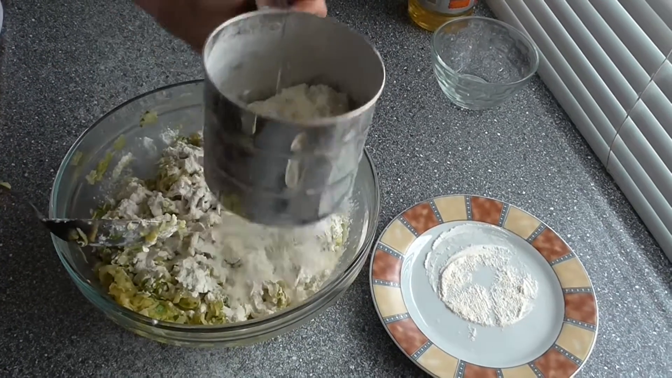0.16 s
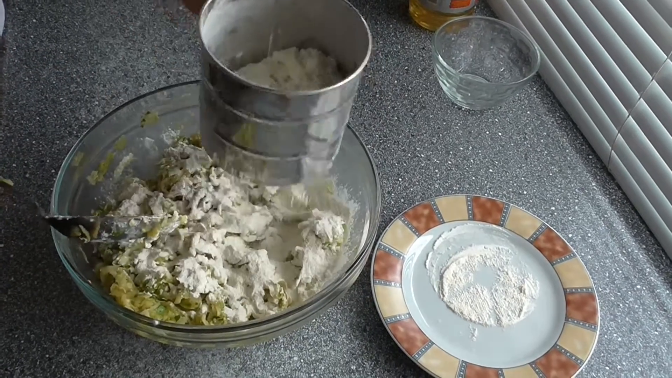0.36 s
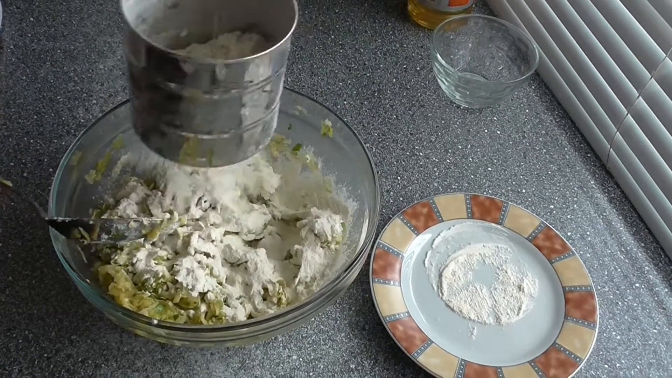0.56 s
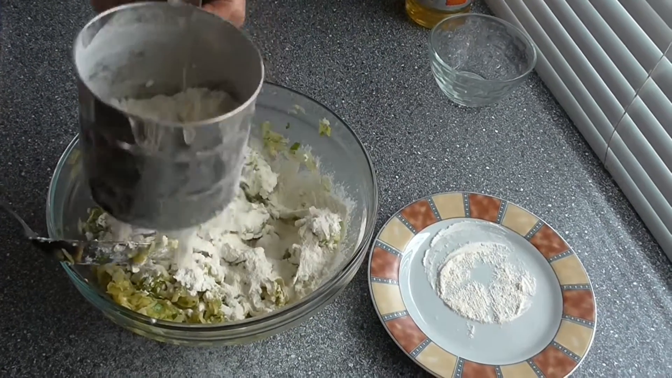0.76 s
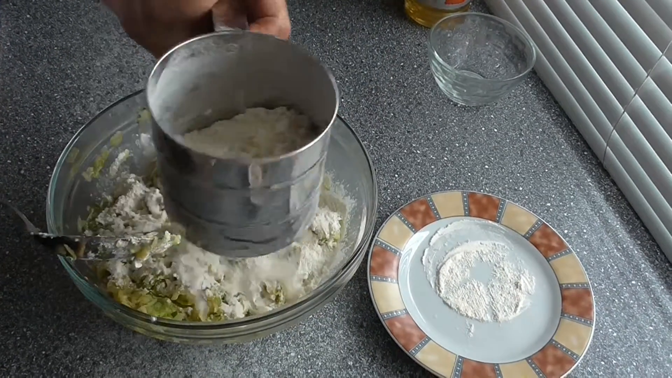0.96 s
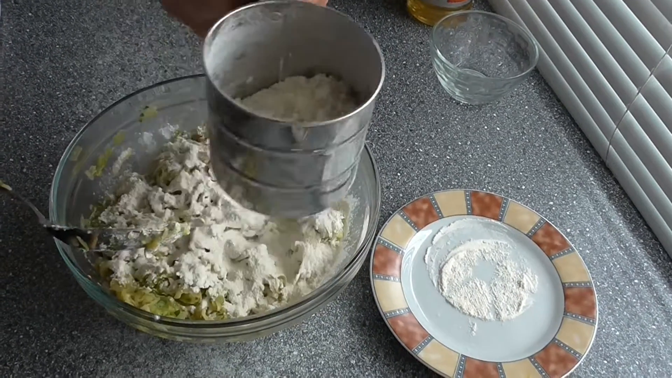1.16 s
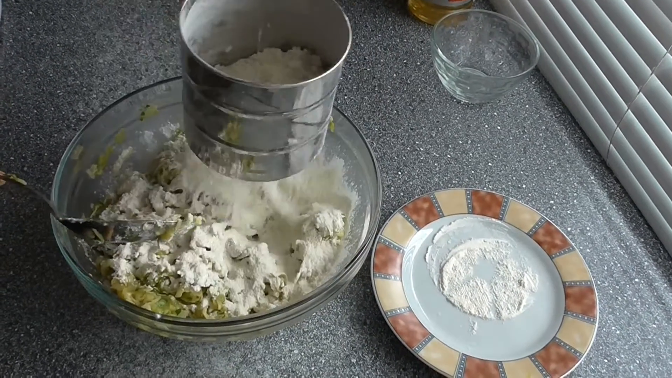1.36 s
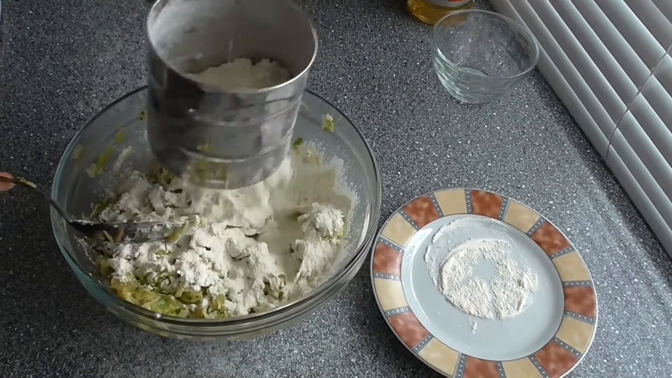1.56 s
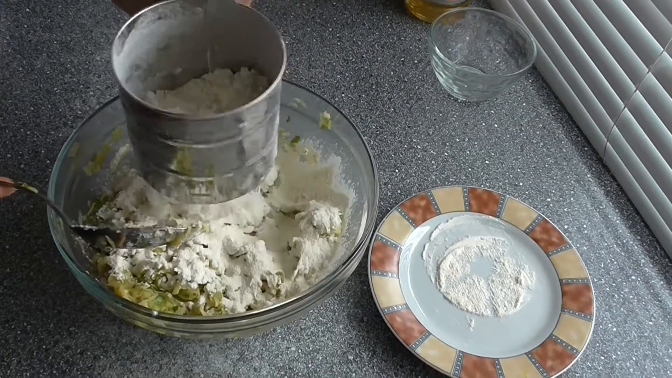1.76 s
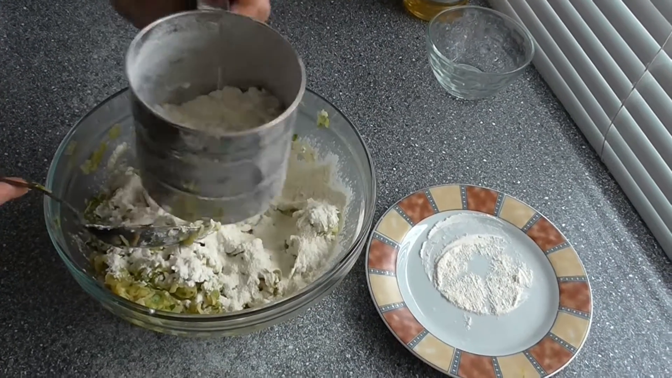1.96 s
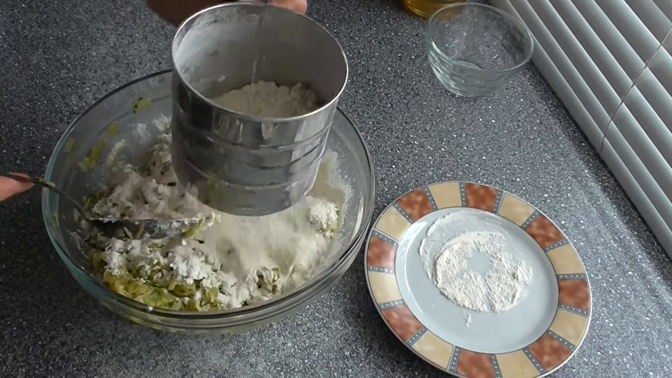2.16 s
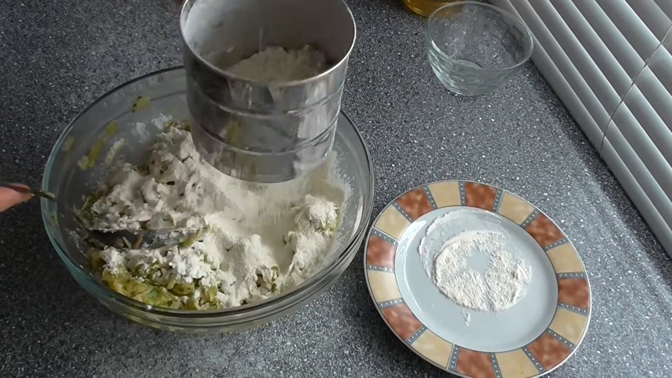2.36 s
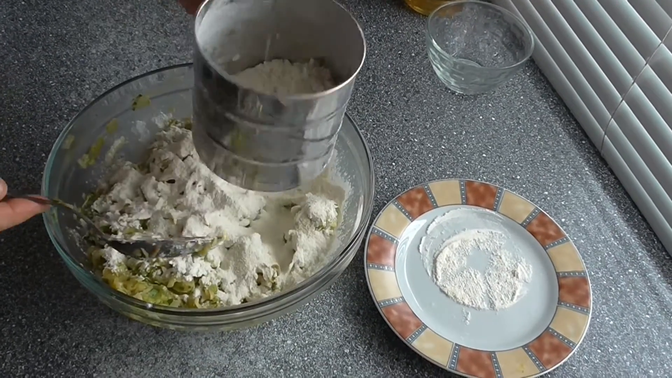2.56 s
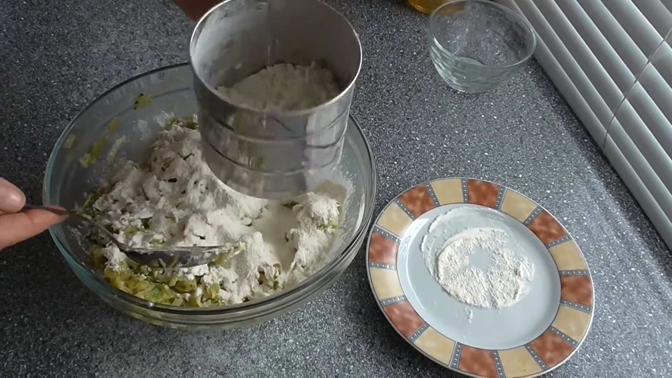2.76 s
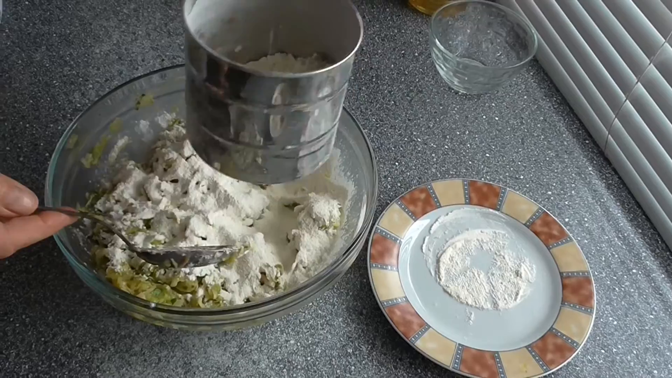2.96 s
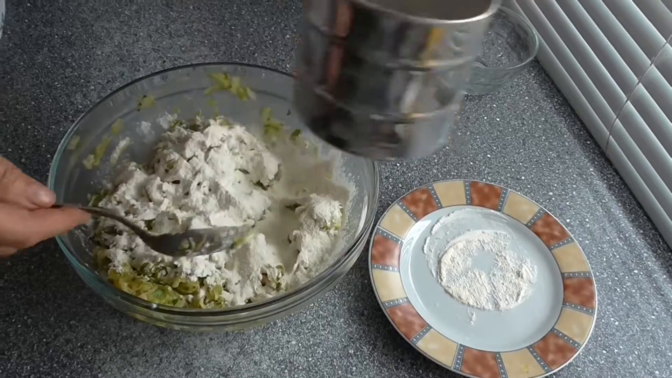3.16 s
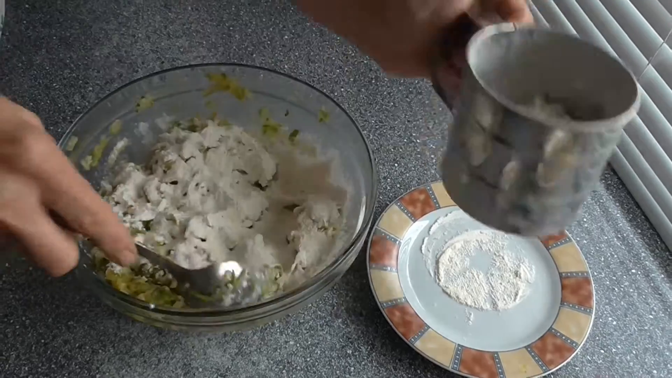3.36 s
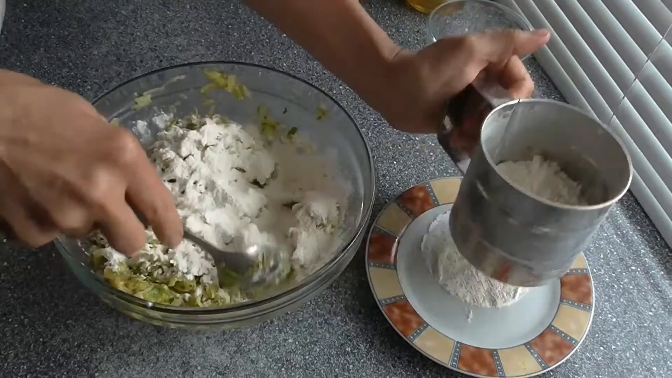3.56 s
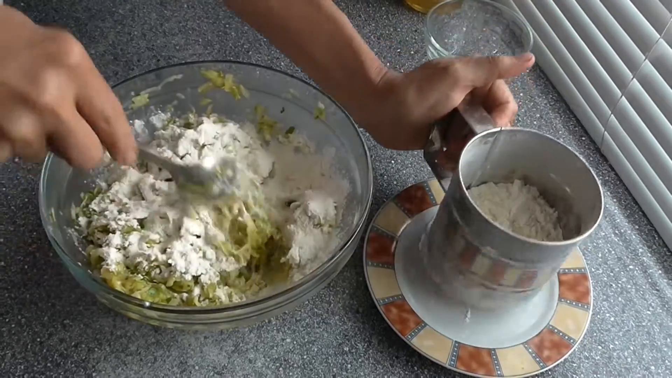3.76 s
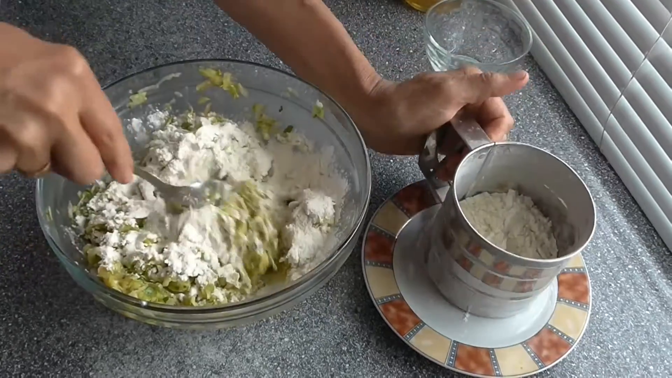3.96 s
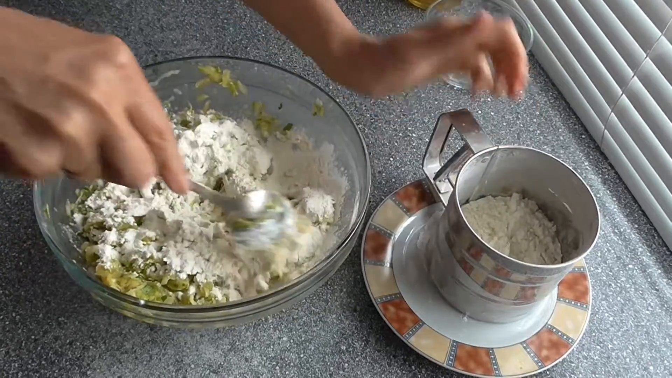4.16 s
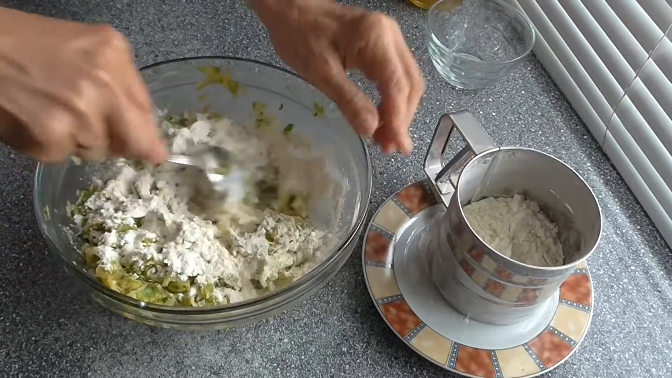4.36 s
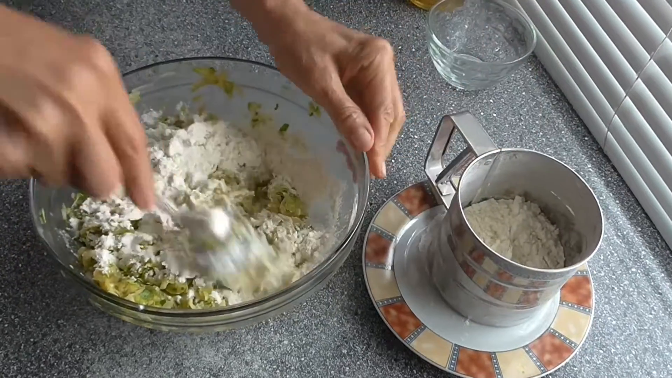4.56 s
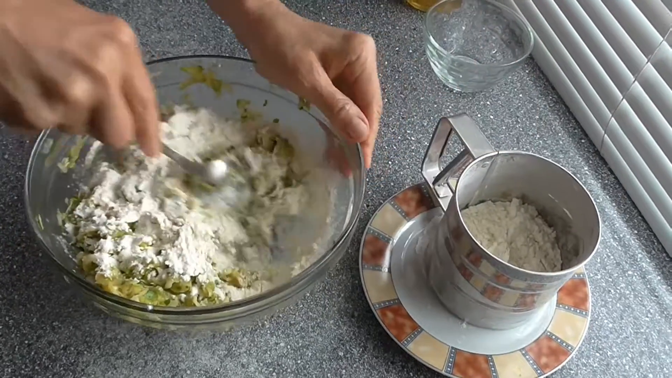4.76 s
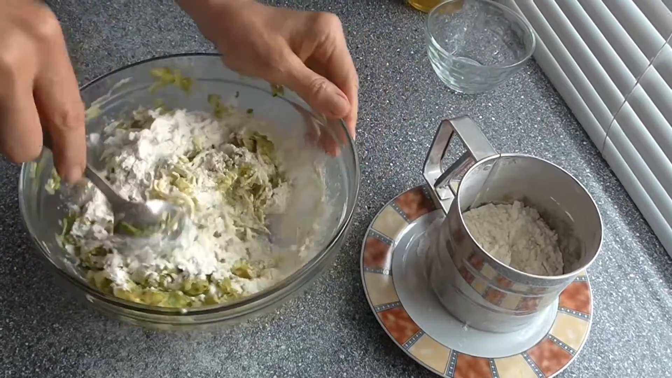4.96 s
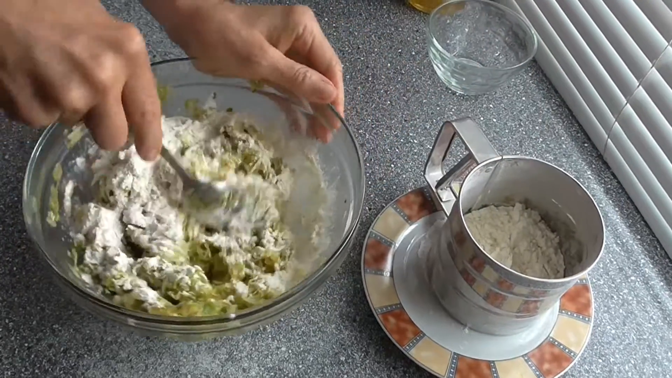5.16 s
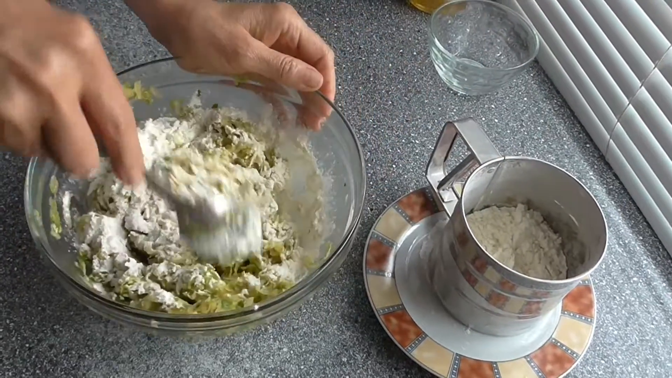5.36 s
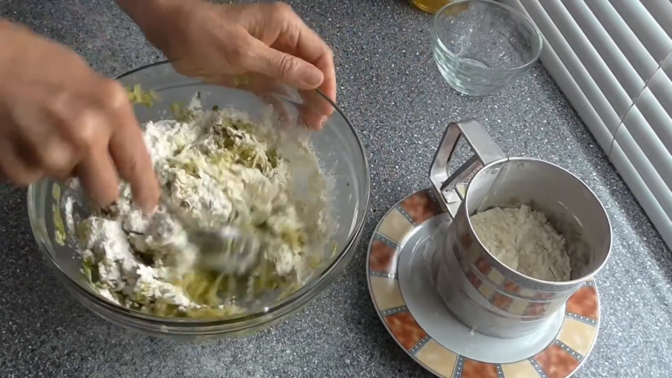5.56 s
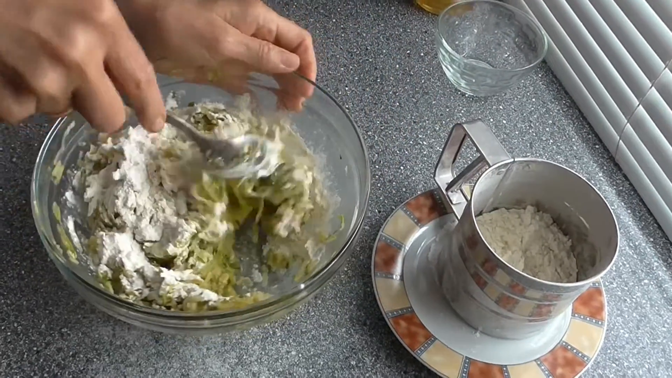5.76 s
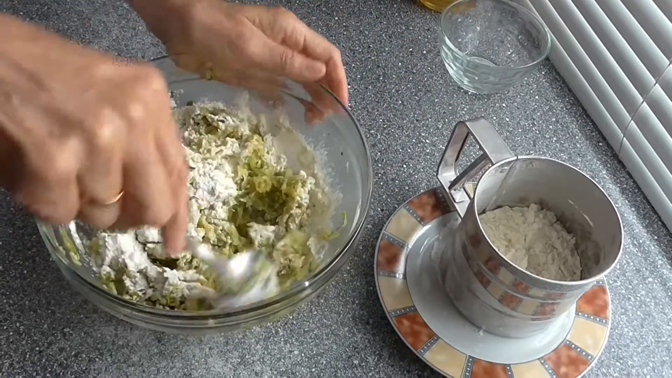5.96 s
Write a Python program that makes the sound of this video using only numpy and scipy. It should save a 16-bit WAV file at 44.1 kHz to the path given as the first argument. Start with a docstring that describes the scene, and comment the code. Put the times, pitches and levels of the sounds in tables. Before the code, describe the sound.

Quick metallic clicking and rasping from a squeezed sifter, a ringing clunk on a plate, then soft crunchy stirring and a spoon striking glass.

```python
"""Clicks and a wiry rasp come first: a squeeze-handle steel sifter is pumped over a glass bowl, its wires
sweeping the mesh and shaking the can. An appliance hums behind it. The sifter is set down on a china
plate, which rings; a spoon crunches flour into a moist mixture, rocks the bowl and strikes the glass.
All stand together on the counter of a small kitchen, heard from nearby by a close pair of microphones."""
import sys
import numpy as np
from scipy import signal
from scipy.fft import rfft, irfft
from scipy.io import wavfile
from scipy.ndimage import uniform_filter1d, minimum_filter1d

SR = 44100
rng = np.random.default_rng(int(sys.argv[2]) if len(sys.argv) > 2 else 0)


def digitize_waveform(pressure):
    """Quantize a signal to 16-bit integers and store it at the path in sys.argv[1].

    Rows of a 2-D input are taken as channels; values are limited to [-1, 1].
    """
    field = np.atleast_2d(pressure).T
    bounded = np.clip(field, -1, 1)
    quanta = np.round(bounded * 32767).astype(np.int16)
    wavfile.write(sys.argv[1], SR, quanta)


N = 268833
TIME = np.arange(N) / SR


def amp(db):
    """Decibels to gain."""
    return 10 ** (np.asarray(db) / 20)


def rms_one(x):
    """Scale to an rms of 1."""
    return x / np.sqrt(np.mean(x ** 2) + 1e-20)


def at_hz(points, hz):
    """Read a table on a log-frequency axis."""
    f, value = np.transpose(points)
    return np.interp(np.log(np.maximum(hz, 1)), np.log(f), value)


def convolve(x, response):
    """Causal convolution, cut to the scene's length."""
    return signal.oaconvolve(x, response)[:N]


def colour(x, spectrum, size=4096):
    """Minimum-phase filter of unit energy: only the shape of the spectrum counts."""
    cepstrum = irfft(np.log(amp(at_hz(spectrum, np.arange(size // 2 + 1) * SR / size))))
    cepstrum[1:size // 2] *= 2
    cepstrum[size // 2 + 1:] = 0
    response = irfft(np.exp(rfft(cepstrum)))
    return convolve(x, response / np.linalg.norm(response))


def ring(x, modes):
    """Each impulse in x sets every mode (Hz, dB, t60) ringing, with alternating signs."""
    t = TIME[:SR // 2]
    response = sum((-1) ** k * amp(db - 60 * t / t60) * np.sin(2 * np.pi * hz * t)
                   for k, (hz, db, t60) in enumerate(modes))
    return convolve(x, response)


def flutter(size):
    """Random wavering of spread 1 that is smooth over size samples."""
    return rms_one(uniform_filter1d(uniform_filter1d(rng.standard_normal(N), size), size))


def grains(per_s, spread_db):
    """Random tiny impacts of uneven size; rms 1."""
    sizes = amp(spread_db * np.minimum(rng.exponential(1, N), 4)) * rng.choice([-1, 1], N)
    return rms_one(sizes * (rng.random(N) < per_s / SR))


def contacts(events, chatter=0, t60=.01):
    """One impulse per event (s, dB), with an optional dying chatter of micro-contacts."""
    out, t = np.zeros(N + SR), TIME[:SR // 10]
    for s, db in events:
        burst = rng.standard_normal(len(t)) * amp(-60 * t / t60)
        burst *= chatter / np.linalg.norm(burst)
        burst[0] = 1
        at = round(s * SR)
        out[at:at + len(t)] += amp(db) * burst / np.linalg.norm(burst)
    return out[:N]


# the hand squeezes the lever (time [s], length [s], force [dB], hardness of contact [dB/octave])
SQUEEZES = [(-.02, .045, -24.5, 4), (0.248, 0.048, -25.5, 1.5), (0.525, 0.058, -27.5, -0.5),
            (0.8, 0.049, -26, -4.5), (1.073, 0.046, -23.5, -5), (1.343, 0.051, -26, 4),
            (1.606, 0.047, -26, -1.5), (1.872, 0.046, -25, 1.5), (2.153, 0.043, -23, -4.5)]
# the lever is let go with a click (time [s], click level [dB], spring force [dB])
RELEASES = [(0.1442, -13, -30.5), (.413, -16.5, -29), (.6842, -13.5, -30), (0.9478, -15.5, -29.5),
            (1.2444, -14, -28), (1.509, -14.5, -28.5), (1.7725, -16, -27), (2.0477, -17, -28),
            (2.3218, -14, -27)]

def sweeps(return_delay_s=0.009, return_s=0.036, return_hardness=-1.5):
    """The hand drives the wires across, the spring pulls them back; rows like SQUEEZES, in time order."""
    returns = [(s + return_delay_s, return_s, force_db, return_hardness) for s, _, force_db in RELEASES]
    return sorted([tuple(row) for row in SQUEEZES] + returns)


# the rotor knocks against the can (time [s], level [dB])
ROTOR_KNOCKS = [(.014, -9), (.560, -26), (.834, -17), (1.088, -20), (1.361, -10), (1.623, -16),
                (2.072, -17), (2.102, -13), (2.183, -3.5), (2.404, -20.5)]
# broad colour of the can (frequency [Hz], level [dB])
CAN_COLOUR = [(100, -12), (220, -11), (400, -13), (800, 3), (1300, -0.5), (2100, -9.5), (2700, -48),
              (5000, -2), (16000, -14)]
# resonances of the can (frequency [Hz], width [Hz], level [dB])
CAN_MODES = [(414, 27, -11), (556, 29, -12), (684, 114, -6), (842, 140, -0.5), (882, 52, 4), (969, 74, 1.5),
             (1196, 74, -0.5), (1390, 91, -4), (1657, 140, -8), (1880, 112, -4.5)]

def sifter_can(drag, snaps):
    """Dragging wires, rotor knocks and snaps shake the steel can into resonance."""
    starts, _, _, hardnesses = np.transpose(sweeps())
    hardness = np.interp(TIME, starts, hardnesses)
    scrape = drag * grains(per_s=2600, spread_db=1)
    shake = amp(-3) * scrape + amp(1.5) * contacts(ROTOR_KNOCKS) + amp(2) * snaps
    can = amp(-6.5) * colour(shake, CAN_COLOUR)
    for hz, width, db in CAN_MODES:
        # harder contact favours the upper resonances; each also swells and fades as the wires travel
        strength = amp(hardness * np.log2(hz / 900) + 2 * flutter(size=2000))
        t60 = np.log(1000) / (np.pi * width)
        can += amp(28.5) * ring(shake * strength, [(hz, db + 20 * np.log10(width / SR), t60)])
    # the can's sound thins out below about 400 Hz
    return signal.sosfilt(signal.butter(2, 420, "high", fs=SR, output="sos"), can)


# bright rasp of the mesh (frequency [Hz], level [dB])
MESH_COLOUR = [(800, -27), (2000, -26), (2900, -2.5), (4200, 5), (5500, -3.5), (7000, 5.5), (9500, -0.5),
               (12500, 3.5), (15500, -22)]
# thin ringing of wires and mesh (frequency [Hz], level [dB], t60 [s])
WIRE_MODES = [(2070, 5.5, 0.02), (3230, -13, 0.018), (5350, 3.5, 0.025), (6350, -16, 0.011),
              (6800, 3, .012), (7440, 1, 0.013), (10100, -37, .015), (11100, -25, .008)]

def sifter_mesh(drag, snaps):
    """The wires rasp over the mesh in tiny impacts; rasp and snaps set the thin steel ringing."""
    rasp = drag * grains(per_s=3500, spread_db=3)
    steel = ring(amp(-43.5) * rasp + amp(-23) * snaps, WIRE_MODES)
    return amp(-2.5) * colour(rasp, MESH_COLOUR) + steel


# the lever is squeezed right home against its stop (time [s], level [dB])
LEVER_STOPS = [(.0225, -13.5), (.2889, -12.5), (.5725, -14), (.8558, -13.5), (1.388, -17)]
# steel clicks at close range (frequency [Hz], level [dB])
CLICK_COLOUR = [(80, -27), (250, -18), (800, -9), (2000, 11), (2700, 2.5), (3500, 3), (5000, -1),
                (7500, 12.5), (10000, 7.5), (13000, 6), (16000, -6.5)]
# ringing of the lever (frequency [Hz], level [dB], t60 [s])
LEVER_MODES = [(3710, -0.5, 0.014), (4700, -7, 0.032), (5310, 2, 0.019), (5850, -3.5, 0.049),
               (6150, -4, 0.052), (6580, -3, 0.039), (7000, -1, 0.037), (7600, -2, .025)]

def sifter_clicks(snaps):
    """Lever and wires click as they snap free; the lever chatters and rings on hitting its stop."""
    stops = contacts(LEVER_STOPS, chatter=1.0, t60=0.037)
    clicks = colour(amp(9.5) * snaps + amp(3.5) * stops, CLICK_COLOUR)
    return clicks + amp(-14) * ring(contacts(LEVER_STOPS), LEVER_MODES)


# the wires' travel through a sweep (time [share of its length], speed [share of top speed])
SWEEP_SPEED = [(0, 0.44), (.06, 0.16), (.55, 0.99), (.86, 0.67), (1.12, 0.22)]
# the wires catch and snap free during a squeeze (time [s], level [dB])
WIRE_CATCHES = [(.2623, -21), (.5307, -25), (1.0824, -19.5), (1.3573, -21), (1.375, -23), (1.6172, -21),
                (1.6382, -21), (1.8806, -13.5), (2.159, -13.5)]

def sifter(usual_force_db=-26, mesh_drive_db=-33.5, mesh_follows=0.63):
    """Each sweep speeds up and stops short; the wires catch and slip on the mesh and shake the can."""
    can_force, mesh_force = np.zeros(N), np.zeros(N)
    for s, length, force_db, _ in sweeps():
        speed = np.interp((TIME - s) / length, *np.transpose(SWEEP_SPEED), left=0, right=0)
        can_force += amp(force_db) * speed
        # the mesh follows only a share of any change in force
        mesh_force += amp(mesh_drive_db + mesh_follows * (force_db - usual_force_db)) * speed
    catching = amp(2 * flutter(size=130))
    release_clicks = [(s, click_db) for s, click_db, _ in RELEASES]
    snaps = contacts(release_clicks + list(WIRE_CATCHES), chatter=7.8, t60=0.034)
    can = sifter_can(can_force * catching, snaps)
    mesh = sifter_mesh(mesh_force * catching, snaps)
    return can + mesh + sifter_clicks(snaps)


# an appliance humming in the background (frequency [Hz], level [dB])
HUM_TONES = [(49, -64.5), (147, -62.5), (196, -59.5), (225, -59), (245, -64), (294, -68.5), (343, -68),
             (442, -68), (539, -64), (638, -66.5)]
# room tone of the kitchen (frequency [Hz], level [dB])
ROOM_TONE = [(25, -35), (50, -31), (75, -4.5), (120, -7.5), (210, 1), (270, -3.5), (400, -2), (540, -0.5),
             (950, -12), (1750, -14), (2200, -21), (2800, -27.5), (4000, -21), (5200, -23), (8000, -22),
             (11000, -27.5), (16000, -33.5)]

def hum_and_room_tone(noise_db=-54.5):
    """A steady motor hum, alike at both microphones, over the soft, wide noise of the room."""
    hum = sum(np.sqrt(2) * amp(db) * np.sin(2 * np.pi * (hz * TIME + rng.random()))
              for hz, db in HUM_TONES)
    mid, side = (colour(rng.standard_normal(N), ROOM_TONE) for _ in range(2))
    return hum + amp(noise_db) * (mid + amp(-4) * side * [[1], [-1]])


# faint falling squeaks (time [s], length [s], start pitch [Hz], end pitch [Hz], level [dB])
SQUEAKS = [(2.851, 0.098, 4250, 3100, -60.5), (3.497, .1, 4400, 3300, -62)]
# the released handle settles (time [s], level [dB])
HANDLE_KNOCK = [(3.682, -41.5)]
# ringing of the handle (frequency [Hz], level [dB], t60 [s])
HANDLE_MODES = [(714, 2, 0.046), (1500, -14, .03)]

def squeaks_and_knock():
    """Two faint, thin, falling squeaks are heard, then a soft knock."""
    out = ring(contacts(HANDLE_KNOCK), HANDLE_MODES)
    for s, length, start_hz, end_hz, db in SQUEAKS:
        progress = np.clip((TIME - s) / length, 0, 1)
        hz = (start_hz + (end_hz - start_hz) * progress) * (1 + 0.0735 * flutter(size=25))
        out += amp(db) * np.sin(np.pi * progress) * np.sin(2 * np.pi * np.cumsum(hz) / SR)
    return out


# the spoon pushes through the mixture (peak time [s], build-up [s], ease-off [s], crunch [dB], grit [dB])
SPOON_PUSHES = [(3.605, 0.033, 0.052, -68, -59.5), (3.775, 0.1, 0.15, -63.5, -57),
                (4.2, 0.081, 0.033, -40.5, -46.5), (4.44, 0.029, 0.026, -52, -51),
                (4.535, 0.057, 0.069, -47.5, -58.5), (4.725, 0.028, 0.043, -50, -55),
                (4.935, 0.12, 0.1, -40.5, -51.5), (5.09, 0.14, 0.14, -44.5, -71),
                (5.216, 0.096, 0.18, -40.5, -49.5), (5.385, 0.045, 0.029, -49.5, -58.5),
                (5.57, 0.028, 0.11, -58.5, -54), (5.81, 0.13, 0.12, -41, -49),
                (6.047, 0.0055, 0.071, -60, -55.5)]

def spoon_force(drop_db=12, roundness=1.57):
    """Each push builds up and eases off; gives the strength of the crunch and of the grit."""
    crunch, grit = np.zeros(N), np.zeros(N)
    for s, build_s, ease_s, crunch_db, grit_db in SPOON_PUSHES:
        from_peak = np.maximum((s - TIME) / build_s, (TIME - s) / ease_s)
        force = amp(-np.minimum(drop_db * from_peak ** roundness, 100))   # roundness 1: pointed, 2: bell
        crunch = np.hypot(crunch, amp(crunch_db) * force)
        grit = np.hypot(grit, amp(grit_db) * force)
    return crunch, grit


# low crunch of flour (frequency [Hz], level [dB])
CRUNCH_COLOUR = [(80, -26.5), (160, -1), (260, 0.5), (350, 7), (440, 1.5), (900, 2.5), (1500, -2),
                 (2100, -10.5), (2700, -20), (6000, -27), (16000, -76)]
# hiss of grit under the spoon (frequency [Hz], level [dB])
GRIT_COLOUR = [(800, -11), (2500, -12), (4000, 0), (6000, 1), (8500, 3.5), (11000, -2.5), (15500, -12)]
# small ticks of spoon and steel (time [s], level [dB])
TICKS = [(3.5715, -35), (3.695, -38), (3.7255, -24), (3.774, -31.5), (3.807, -31.5), (3.8395, -29.5),
         (3.8995, -32), (4.0584, -10.5), (4.408, -25.5), (4.5485, -32), (4.8294, -25), (4.859, -34),
         (5.165, -30), (5.5595, -31), (5.63, -25), (5.695, -27), (5.7422, -22), (5.982, -34)]
# bright colour of those ticks (frequency [Hz], level [dB])
TICK_COLOUR = [(500, -41), (1500, -4), (5000, -2.5), (8500, 6), (12000, -1.5), (16000, -18)]

def stirring():
    """Packed flour gives way in countless slips; grit ticks along the spoon and moist strands snap."""
    crunch, grit = spoon_force()
    flour = amp(3.5) * colour(crunch * grains(per_s=3000, spread_db=2), CRUNCH_COLOUR)
    hiss = amp(-1.5) * colour(grit * grains(per_s=3800, spread_db=4.5), GRIT_COLOUR)
    # each strand snaps at one of twelve pitches and dies away in 16 cycles
    strands = sum(ring(grit * grains(per_s=14, spread_db=3), [(hz, 0, 16 / hz)])
                  for hz in np.geomspace(3000, 13000, 12))
    ticks = amp(6) * colour(contacts(TICKS, chatter=1.8, t60=0.0039), TICK_COLOUR)
    return flour + hiss + amp(-23.5) * strands + ticks


# the sifter's rim lands on the plate (time [s], level [dB])
RIM_TOUCHES = [(3.9877, -1), (3.9890, -0.5), (3.9912, -15)]
# dull thud of the plate on the counter (frequency [Hz], level [dB])
THUD_COLOUR = [(30, -27), (110, -12), (240, -10.5), (450, -4), (1300, -4), (2500, -10.5), (3200, -20),
               (5000, -19.5), (9000, -24), (16000, -34)]
# plate and can ringing together (frequency [Hz], level [dB], t60 [s])
PLATE_MODES = [(351, -26.5, 0.13), (462, -12.5, 0.073), (668, -21, 0.095), (820, -25, 0.12),
               (920, -28, 0.1), (1048, -27, 0.17), (1134, -15.5, 0.065), (1443, -13.5, 0.061),
               (1590, -38.5, 0.45), (1770, -26, 0.087), (2135, -14, 0.073), (2130, -43, .4),
               (2580, -24, 0.033), (2656, -15, 0.057), (2708, -38.5, 0.33), (3280, -48, 0.42),
               (4030, -21, 0.036), (4330, -39, 0.1), (4256, -57, 0.6), (5000, -23, 0.017),
               (5820, -33.5, 0.11), (7000, -26, 0.041), (7900, -29, 0.074), (9870, -40, .08)]

def sifter_on_plate():
    """The steel rim meets the china in quick touches; the firmest sets the plate ringing."""
    thud = amp(24) * colour(contacts(RIM_TOUCHES, chatter=1.32, t60=0.026), THUD_COLOUR)
    firmest = max(RIM_TOUCHES, key=lambda touch: touch[1])
    return thud + amp(13) * ring(contacts([firmest]), PLATE_MODES)


# the bowl judders as it slides (time [s], slip rate [Hz], level [dB])
JUDDER = [(5.14, 225, -42), (5.168, 197, -43), (5.209, 180, -34.5), (5.239, 163, -40), (5.272, 156, -38.5),
          (5.32, 164, -70)]
# the bowl rocks (time [s], level [dB])
ROCKING = [(5.572, -19.5), (5.599, -28), (6.088, -24)]
# low ringing of its foot on the counter (frequency [Hz], level [dB], t60 [s])
FOOT_MODES = [(193, 0.5, 0.065), (226, 2, 0.037), (372, -10, 0.087), (596, -15.5, 0.039),
              (900, -21.5, 0.049)]

def bowl_foot():
    """Pushed by the spoon, the bowl sticks and slips on the counter, then rocks."""
    s, slip_hz, db = np.transpose(JUDDER)
    phase = 2 * np.pi * np.cumsum(np.interp(TIME, s, slip_hz)) / SR
    slips = np.sin(phase) + amp(-5) * np.sin(2 * phase) + amp(-11) * np.sin(3 * phase)
    uneven = amp(0.73 * flutter(size=300))
    judder = rms_one(slips) * uneven * amp(np.interp(TIME, s, db, left=-120, right=-120))
    return judder + ring(contacts(ROCKING), FOOT_MODES)


# the spoon hits the glass (time [s], level [dB])
SPOON_HITS = [(5.6484, 0.5)]
# crack of that hit (frequency [Hz], level [dB])
CRACK_COLOUR = [(50, 9), (300, -3), (900, 10.5), (2000, 8.5), (3200, 1.5), (5500, 3.5), (9000, -7.5),
                (16000, -12)]
# ringing of the filled bowl and the spoon (frequency [Hz], level [dB], t60 [s])
GLASS_MODES = [(243, -31.5, 0.13), (351, -23, 0.095), (892, -28.5, 0.093), (1430, -40, 0.063),
               (2240, -31.5, 0.12), (3420, -27.5, 0.05), (5150, -32, 0.073), (5400, -32.5, 0.088),
               (5840, -28, 0.051), (7300, -28, 0.056)]

def spoon_on_glass():
    """A hard crack with a brief skid, and a short ring choked by the mixture."""
    crack = amp(6.5) * colour(contacts(SPOON_HITS, chatter=1.0, t60=0.016), CRACK_COLOUR)
    return crack + ring(contacts(SPOON_HITS), GLASS_MODES)


# decay of the kitchen's reverberation (frequency [Hz], t60 [s])
ROOM_T60 = [(150, 0.05), (500, .5), (1500, 0.38), (4000, 0.51), (8000, 0.3), (15000, 0.5)]
# its colour at the microphones (frequency [Hz], level [dB])
ROOM_COLOUR = [(150, 0), (500, -4), (1500, -9.5), (4000, -9.5), (8000, -9.5), (15000, -22)]
# the share of it that differs between the microphones (frequency [Hz], level [dB])
ROOM_SIDE = [(150, -17), (500, -15), (2000, -6.5), (8000, -8.5)]

def at_microphones(x, pan_db, width_db, wet_db, dull_db=0):
    """Direct sound and kitchen reflections reach the pair; dull_db dims the reverberation's treble."""
    t, edges = TIME[:SR * 2 // 3], np.geomspace(90, 17000, 11)
    tail = np.zeros((2, len(t)))   # mid, side
    for low, high in zip(edges, edges[1:]):
        hz = np.sqrt(low * high)
        bandpass = signal.butter(2, [low, high], "band", fs=SR, output="sos")
        band = signal.sosfilt(bandpass, rng.standard_normal(tail.shape))
        band *= amp(-60 * t / at_hz(ROOM_T60, hz)) * (1 - np.exp(-(t / 0.0024) ** 2))
        band_db = wet_db - dull_db * (hz > 5000) + at_hz(ROOM_COLOUR, hz)
        gain = np.sqrt(2 * (high - low) / SR) * amp(band_db) * amp([[0], [at_hz(ROOM_SIDE, hz)]])
        tail += gain * band / np.linalg.norm(band, axis=1, keepdims=True)
    # the counter and the wall reflect from the side within a few milliseconds, most in the treble
    near = signal.lfilter([1, -.45], [1], rng.standard_normal(len(t))) * amp(-60 * t / 0.0068)
    side = convolve(x, tail[1] + amp(width_db) * near / np.linalg.norm(near))
    left_right = np.array([[1], [-1]])
    return x * amp(left_right * pan_db / 2) + convolve(x, tail[0]) + left_right * side


def limiter(x, ceiling_db=2.5, recovery_db_per_s=25, reaction_s=0.0012):
    """The recorder turns its gain down at once on a peak over the ceiling, and lets it creep back."""
    over_db = np.maximum(20 * np.log10(np.abs(x).max(axis=0) + 1e-9) - ceiling_db, 0)
    recovery_db = recovery_db_per_s * TIME
    held_db = np.maximum.accumulate(over_db + recovery_db) - recovery_db
    size = 2 * round(reaction_s * SR) + 1
    return x * amp(uniform_filter1d(minimum_filter1d(-held_db, size), size))


def scene():
    """Sifter, plate and bowl stand close together on the counter, just right of the pair's centre."""
    # the sifter sways among three spots over the bowl, so successive strokes meet different reflections
    spot = np.searchsorted([s - .02 for s, *_ in sweeps()], TIME) % 3
    opening = sifter() + squeaks_and_knock()
    swaying = sum(at_microphones(opening * (spot == k), pan_db=-.5, width_db=-10.5, wet_db=-0.07)
                  for k in np.unique(spot))
    plate = at_microphones(sifter_on_plate(), pan_db=-2, width_db=-6.5, wet_db=-3, dull_db=15)
    mixing = stirring() + spoon_on_glass() + bowl_foot()
    bowl = at_microphones(mixing, pan_db=-0.5, width_db=-9, wet_db=1.4)
    return swaying + plate + bowl + hum_and_room_tone()


def record(dry):
    """The recorder ducks the loudest peaks, rounds what is left of them and cuts the highest treble."""
    rounded = np.tanh(limiter(dry)) * .95
    return signal.sosfilt(signal.cheby2(16, 70, 17200, fs=SR, output="sos"), rounded)


dry = scene()
out = record(dry)
digitize_waveform(out)
```